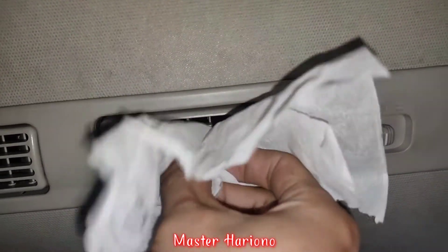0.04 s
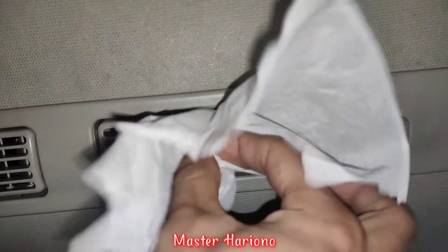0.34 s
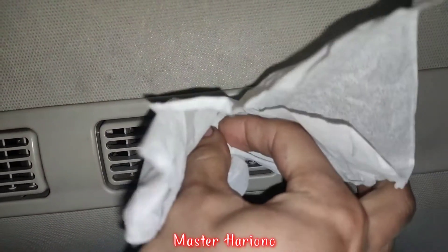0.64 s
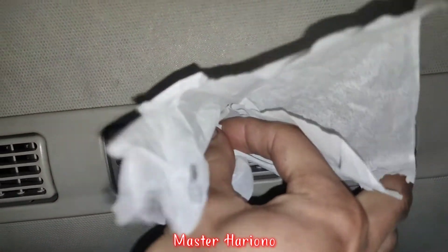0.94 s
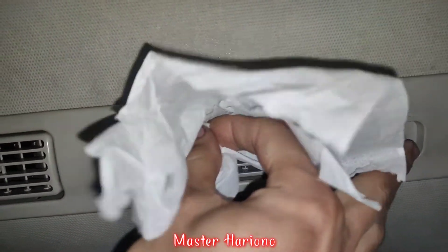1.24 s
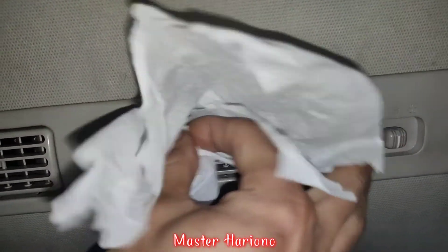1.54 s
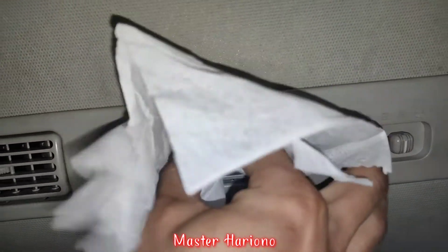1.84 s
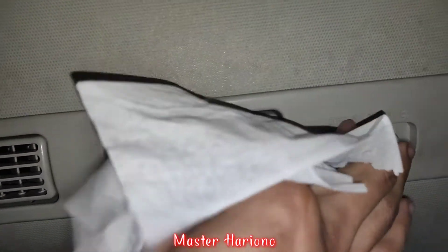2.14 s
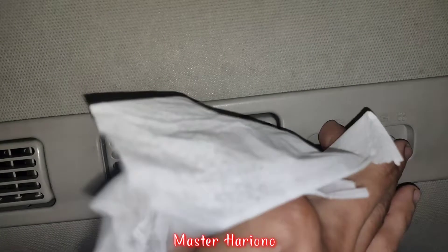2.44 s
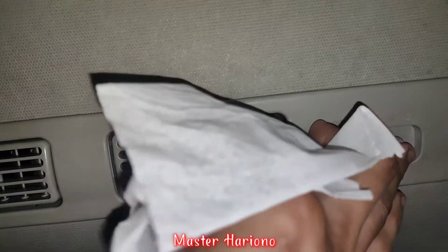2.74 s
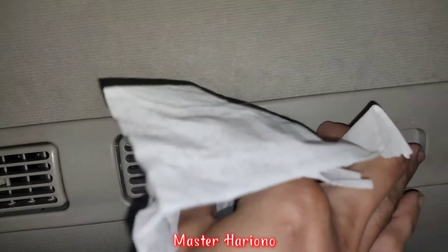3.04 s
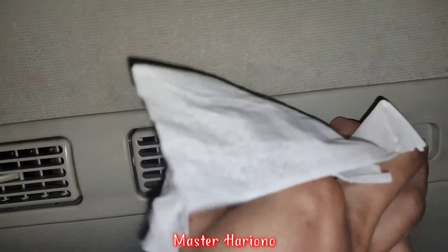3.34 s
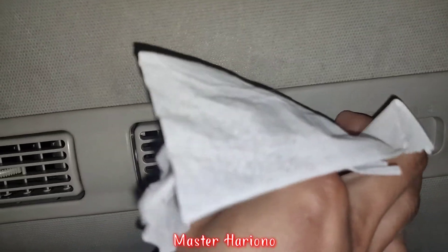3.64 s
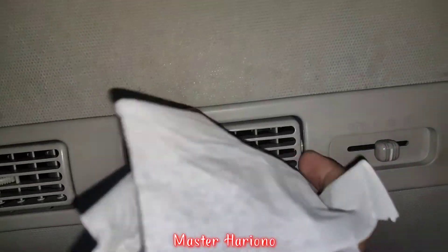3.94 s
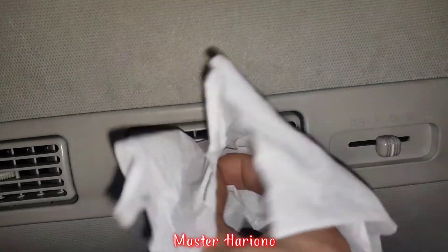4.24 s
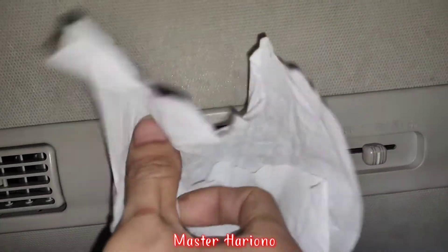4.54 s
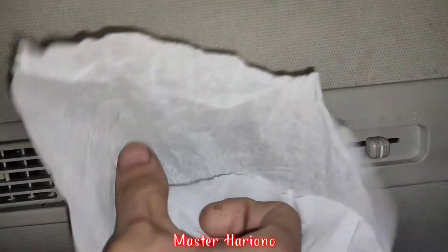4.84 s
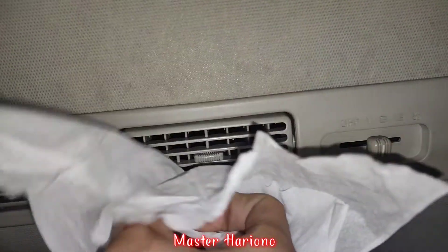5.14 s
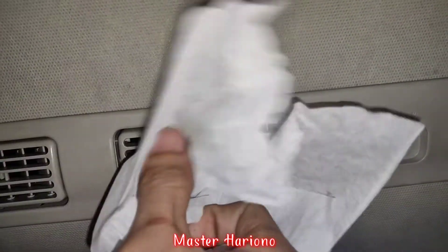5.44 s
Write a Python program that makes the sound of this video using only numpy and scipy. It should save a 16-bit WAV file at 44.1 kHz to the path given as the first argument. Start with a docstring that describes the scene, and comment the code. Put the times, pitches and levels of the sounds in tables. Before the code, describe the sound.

A tissue flaps in gusty air from a car vent; a plastic click, the fan dies down, and the idling car hums on.

```python
"""Inside a car, right at a roof vent, a tissue flaps in the jet of the air conditioning at full speed.
It throws gusts and dry cracks onto the left microphone, over the steady rush of air in the duct.
The switch snaps off and the fan coasts down. The idling car hums on,
a hand bumps the trim and the tissue swishes faintly."""
import sys
import numpy as np
from scipy import signal
from scipy.fft import rfft, irfft, next_fast_len
from scipy.io import wavfile
from scipy.ndimage import map_coordinates

SR = 44100
rng = np.random.default_rng(int(sys.argv[2]) if len(sys.argv) > 2 else 0)


def dump_mix(stems):
    """Bounce the given channels to the path in sys.argv[1] as a 16-bit WAV at rate SR."""
    frames = np.atleast_2d(stems).T  # one column per channel
    limited = np.clip(frames, -1, 1)  # hard clip at full scale
    pcm = np.round(limited * 32767).astype(np.int16)
    wavfile.write(sys.argv[1], SR, pcm)


N = 246334
TIME, FREQ = np.arange(N) / SR, np.geomspace(1, SR / 2, num=4000)
OFF_S, RUNDOWN_S = 3.586, 0.57   # when the motor stops, and how long the air takes to die down
USUAL_JET_DB = -24


# the tissue's big flaps, one gust each: t/s, level/dB, length/s, swirl pitch f/Hz
TISSUE_FLAPS = [(0.004, -13.5, 0.0069, 334), (0.02, -11.5, 0.0061, 301.4), (0.033, -8, 0.0063, 401),
                (0.084, -11, .012, 450.5), (0.102, -15.5, 0.0096, 302), (0.128, -12, 0.0068, 410),
                (0.159, -14, 0.0085, 385), (0.181, -13, 0.012, 430), (0.221, -14, 0.0072, 319),
                (0.316, -12.5, 0.011, 359.1), (.349, -6.5, 0.008, 520), (0.416, -7.5, 0.011, 298),
                (.457, -11.5, 0.0099, 349.6), (0.514, -12, 0.017, 340.6), (0.544, -9, 0.0085, 415.7),
                (0.599, -7, 0.0082, 290.2), (.612, -15, .01, 400), (0.665, -12, 0.017, 377.7),
                (0.716, -12.5, 0.0069, 562), (0.731, -9.5, 0.011, 341.3), (.75, -10, 0.0068, 514.5),
                (.772, -14.5, 0.0082, 430.2), (0.796, -11, 0.0052, 510), (0.816, -7.5, 0.0066, 520.5),
                (.831, -16, .008, 450.2), (0.853, -12, 0.014, 429.5), (0.901, -14, 0.0069, 339),
                (0.938, -10, .013, 363.4), (.957, -13.5, 0.008, 300.3), (1.022, -16.5, .01, 330),
                (1.044, -9.5, 0.007, 260.7), (1.062, -15, 0.0079, 300), (1.08, -13, .01, 380.2),
                (1.113, -12.5, 0.01, 338), (1.154, -10.5, .013, 430.8), (1.173, -16.5, 0.0059, 340),
                (1.232, -8.5, 0.0068, 349.5), (1.28, -11, 0.007, 320.8), (1.326, -10.5, 0.013, 388.7),
                (1.401, -7, 0.0058, 377.7), (1.478, -11.5, 0.009, 339.7), (1.51, -10, 0.0082, 249.4),
                (1.557, -12, .013, 328.8), (1.594, -11, 0.0094, 327.7), (1.641, -10, 0.0066, 481.3),
                (1.679, -11, 0.0081, 349.7), (1.699, -9.5, 0.0076, 310.9), (1.733, -13, .009, 270.6),
                (1.768, -13, 0.0096, 299), (1.796, -9.5, .012, 350.6), (1.87, -11, 0.02, 360),
                (1.906, -15, .012, 329.1), (1.953, -9.5, 0.0084, 290.3), (1.964, -14, 0.018, 140),
                (1.977, -10.5, 0.014, 260), (2.043, -14, .01, 319.8), (2.066, -11.5, 0.022, 339.7),
                (2.117, -10, 0.0062, 329.5), (2.159, -6.5, 0.0072, 371), (2.1945, -8.5, 0.00482, 409.7),
                (2.243, -9.5, 0.0082, 339.7), (2.288, -9.5, 0.0066, 319.1), (2.316, -8, 0.0082, 423.2),
                (2.352, -14, 0.0068, 353), (2.368, -12.5, 0.0078, 400.6), (2.389, -18, 0.0078, 330.6),
                (2.414, -10, 0.0059, 439.3), (2.464, -14, .022, 390.4), (2.493, -17, 0.0069, 360),
                (2.535, -10, .009, 448.5), (2.574, -11, 0.0089, 310), (2.62, -13, 0.0061, 313.5),
                (2.634, -16, .011, 419.3), (2.664, -8.5, 0.0079, 481.2), (2.706, -10.5, .014, 442.3),
                (2.728, -9, 0.0085, 398.7), (2.783, -8.5, 0.0071, 421.4), (2.833, -18, 0.01038, 350.6),
                (2.852, -10, 0.017, 360), (2.911, -12, 0.01, 330.8), (2.9406, -7, 0.0061, 390.4),
                (2.958, -10.5, .008, 270.4), (2.982, -13, 0.0059, 320), (2.997, -13, 0.0089, 409),
                (3.023, -17, 0.0097, 360), (3.053, -12, 0.0055, 439.8), (3.084, -14.5, 0.024, 438.7),
                (3.122, -12, 0.0063, 338.8), (3.152, -12.5, .016, 379.9), (3.175, -12.5, 0.011, 399.5),
                (3.195, -14.5, 0.011, 321.1), (3.212, -17, 0.0081, 349.7), (3.259, -15, .017, 402),
                (3.297, -9, 0.0083, 298.5), (3.335, -12, .016, 411.4), (3.352, -16, 0.0069, 339.7),
                (3.396, -7, 0.0068, 380.2), (3.424, -11, 0.0099, 416), (3.446, -16.5, .012, 430),
                (3.467, -10, 0.0053, 429.5), (3.488, -11, 0.017, 320.3), (3.517, -10.5, 0.0048, 341.3),
                (3.562, -9.5, .013, 408.4), (3.625, -11.5, .016, 370.5), (3.641, -12.5, 0.0051, 380),
                (3.676, -14.5, .01, 349.3), (3.711, -11.5, .011, 310.3), (3.745, -13, 0.0083, 360.2),
                (3.764, -10, .005, 250.7), (3.8, -16.5, .008, 340.2), (3.828, -18, 0.01402, 234.8),
                (3.851, -25.5, .014, 194.9), (3.883, -21.5, 0.013, 200), (3.925, -23, .022, 174.8),
                (3.984, -32, 0.016, 170), (4.018, -34, .015, 170.3)]
# the sound of small swirls of air when their pitch is swirl_hz: f/Hz, level/dB
SWIRL_SPECTRUM = [(20, -27), (50, -9.5), (100, -3), (170, 1.5), (300, -1.5), (480, -3.5), (700, -10.5),
                  (1000, -23.5), (1600, -39), (3000, -62.5), (8000, -75.5)]

def gusts(swirl_hz=363.5, wake_hz=240.05, core_s=0.0062, lead_s=0.002123, skew=0.19):
    """Each gust off the tissue is a spinning core of air in small swirls; faster air sounds higher."""
    rows = np.vstack([TISSUE_FLAPS, trembles()])
    start, level_db, length, hz = rows.T
    # shorter gusts are about half pop, longer ones mostly swirling air; slowing air pops less
    core = air_speed(start) / (1 + (length / core_s) ** 2)
    pops = np.zeros(N)
    for s, db, core_length, pitch in zip(start, level_db, core * length, hz):
        pop, at = vortex(pitch, db), max(int((s - lead_s) * SR), 0)
        pops[at:at + len(pop)] += from_db(db) * np.sqrt(core_length) * pop
    # the wake is the rough air left between gusts
    wake = from_db(USUAL_JET_DB + jet_db(TIME) + rundown_db(TIME) + 2 * drift(59.6)) ** 2
    power = swells(rows, 1 - core) + wake
    mean_hz = (swells(rows, (1 - core) * hz) + wake_hz * rundown_pitch(TIME) * wake) / power
    # reading the noise faster raises its pitch
    swirls = map_coordinates(noise(SWIRL_SPECTRUM), [np.cumsum(mean_hz / swirl_hz)], mode="mirror")
    flow = hold_level(swirls)
    pressure = flow + skew * (flow ** 2 - 1)   # grows with flow squared, which sharpens the peaks
    return pops + np.sqrt(power) * pressure


def trembles(per_s=48, length_s=0.007, jitter_s=0.003):
    """The tissue trembles between flaps, making small gusts: rows as in TISSUE_FLAPS."""
    edges = [0] + [s for s, *_ in TISSUE_FLAPS] + [OFF_S + RUNDOWN_S]
    beats = np.concatenate([np.linspace(a, b, max(round((b - a) * per_s), 1), endpoint=False)[1:]
                            for a, b in zip(edges, edges[1:])])
    late, strong, high = rng.standard_normal((len(beats), 3)).T
    db = -19.5 + 1.02 * jet_db(beats) + rundown_db(beats) + 1.5 * strong
    octaves = 0.035 * jet_db(beats) + 0.1514 * high   # a fuller jet makes faster swirls
    hz = 341.6 * rundown_pitch(beats) * 2 ** octaves
    return np.c_[beats + jitter_s * late, db, np.full(len(beats), length_s), hz]


def vortex(hz, strength_db):
    """A spinning core of air pops on the microphone: a dip, a peak and a short rebound."""
    sharpness = from_db(0.26 * (strength_db + 7)).clip(0.8, 1.8)   # stronger is brighter
    band = signal.butter(3, [0.38 * hz, 1.46 * hz * sharpness], "band", fs=SR, output="sos")
    pop = -signal.sosfilt(band, signal.unit_impulse(SR // 20))
    return pop / np.sqrt(np.sum(pop ** 2) / SR)


# how much of the jet gets past the tissue: t/s, level/dB
JET_STRENGTH = [(0, -18), (.27, -24), (.55, -23), (.8, -19), (1.05, -20.5), (1.2, -31), (1.43, -31),
                (1.6, -24.5), (1.85, -29), (2.3, -28), (2.65, -24), (2.8, -27), (2.92, -20), (3.2, -20),
                (3.37, -26.5), (3.45, -19), (3.68, -19.5), (3.86, -26)]

def jet_db(s):
    """How far the jet at the microphone is above its usual strength."""
    return np.interp(s, *np.transpose(JET_STRENGTH)) - USUAL_JET_DB


def air_speed(s):
    """Share of full air speed: it falls steadily once the motor is off."""
    return np.clip(1 - (s - OFF_S) / RUNDOWN_S, 0.05, 1)


def rundown_db(s):
    """Slower air pushes less hard, so the wind gets quieter."""
    return 20 * np.log10(air_speed(s) ** 1.636)


def rundown_pitch(s):
    """Share of their pitch that the swirls keep as the air slows."""
    return air_speed(s) ** 0.55


# moments when the tissue bellies out: t/s, length/s
TISSUE_LULLS = [(0.062, 0.021), (0.121, 0.01), (0.34, 0.012), (0.439, 0.015), (0.484, .012), (0.52, 0.008),
                (0.634, 0.013), (0.887, 0.0089), (1.001, .012), (1.135, .012), (1.215, 0.014),
                (1.258, 0.019), (1.3, 0.017), (1.364, 0.017), (1.44, 0.028), (1.835, 0.025), (1.933, .02),
                (2.021, 0.017), (2.146, 0.011), (2.219, 0.019), (2.267, 0.015), (2.339, 0.01),
                (2.514, 0.019), (2.654, 0.0073), (2.768, .012), (2.81, .018), (2.875, .012),
                (2.928, 0.0078), (2.971, 0.005), (3.062, 0.0083), (3.242, 0.0099), (3.379, 0.013)]

def lulls(depth_db=-5.5):
    """A gain for the gusts that dips while the tissue blocks the jet."""
    return from_db(depth_db * swells([(s, 0, length) for s, length in TISSUE_LULLS], lean=0))


# the edge of the tissue whips over: t/s, level/dB, f/Hz
EDGE_WHIPS = [(0.0353, -23, 1300), (.0866, -20, 1300), (.155, -22, 1100), (.182, -22.5, 990),
              (0.26, -23, 1400), (0.3476, -18, 1202), (.455, -23, 1149), (0.5403, -32, 1500),
              (0.714, -22, 1348), (.722, -23, 1600), (0.7335, -23, 1200), (.752, -25, 1201),
              (0.7954, -15, 1150), (0.815, -17, 895), (.942, -26, 1149), (1.043, -14.5, 947),
              (1.555, -19, 1505), (1.6968, -20, 1300), (1.7067, -21.5, 1350), (1.862, -24, 1299),
              (2.0499, -22, 1350), (2.0565, -22, 1049), (2.0746, -22, 1498), (2.158, -20.5, 1601),
              (2.1946, -16, 1047), (2.2396, -25, 1097), (2.412, -25, 1001), (2.5356, -21, 1451),
              (2.5754, -23, 1404), (2.703, -23.5, 1303), (2.7272, -24, 1399), (2.849, -24, 1201),
              (2.9012, -23, 1250), (2.9385, -18, 1410), (3.1211, -25.5, 1099), (3.1446, -22.5, 1352),
              (3.157, -24, 1050), (3.1764, -19.5, 1350), (3.256, -25, 999), (3.3353, -23, 1299),
              (3.4215, -23.5, 1300), (3.458, -22, 1154), (3.5158, -25.5, 1149), (3.5618, -20, 1150),
              (3.623, -22.5, 1150)]

def cracks(length_s=0.00067):
    """Each whip of the edge throws a tiny, fast vortex, heard as a dry crack."""
    out = np.zeros(N)
    for s, db, hz in EDGE_WHIPS:
        pop, at = vortex(hz, db), int(s * SR)
        out[at:at + len(pop)] += from_db(db) * np.sqrt(length_s) * pop
    return out


# slow swirls at the edge of the jet: f/Hz, level/dB
SPILL_SPECTRUM = [(20, -7), (60, 0), (110, 22), (180, 2), (350, -18), (1000, -92)]

def spill():
    """When the jet is full, swirls at its edge thump on the sheltered right microphone."""
    db = -40 + 1.67 * jet_db(TIME) + rundown_db(TIME) + 5.5 * drift(9)
    return from_db(db) * hold_level(noise(SPILL_SPECTRUM))


# air rushing in the vent: f/Hz, level/dB per Hz
RUSH_SPECTRUM = [(25, -74), (100, -64), (200, -62.5), (450, -63.5), (900, -69), (1500, -70.5), (2500, -75),
                 (4500, -76), (7300, -77.5), (9000, -83), (11500, -94), (15000, -96.5)]
# pitches at which the duct and grille ring: f/Hz, width/Hz, boost/dB
DUCT_RESONANCES = [(295, 75, 7.5), (684, 110, 2.5), (1077, 170, 5), (1443, 56, 6), (2013, 51, 5),
                   (3800, 120, 1), (5200, 36, 5.5), (5830, 40, 7.5), (6900, 60, 1), (6870, 46, 3.5)]
# how fast the rush dies with the motor off: f/Hz, fade/dB per s
RUSH_FADE = [(100, 1.5), (350, 33.5), (1000, 56), (4000, 91), (12000, 106)]

def blower(flutter_db=0.85):
    """Air rushes through the duct and grille; as the fan coasts, the treble dies first."""
    rush = stereo_noise(RUSH_SPECTRUM, DUCT_RESONANCES)
    coasting_s = np.maximum(TIME - OFF_S, 0)
    centres, out = np.geomspace(150, 10000, num=6), 0
    for hz, share in zip(centres, np.eye(len(centres))):
        band = colour(rush, at_hz(np.c_[centres, share]))
        out = out + band * from_db(flutter_db * drift(24) - at_hz(RUSH_FADE, hz) * coasting_s)
    return out


# the slider scrapes, snaps into its stop and rattles: t/s, level/dB, decay/s
SWITCH_HITS = [(3.5675, -10, 0.03), (3.5701, 3, 0.021), (3.5728, -4.5, 0.036), (3.581, -12, .06),
               (3.594, -19, 0.069)]
# the snap of hard plastic: f/Hz, level/dB per Hz
SNAP_SPECTRUM = [(200, -55), (800, -48), (1500, -50), (2800, -57.5), (4800, -50), (7000, -55), (8400, -48),
                 (10000, -57), (11800, -56.5), (12600, -62), (15000, -64)]
# peaks and dips in the snap: f/Hz, width/Hz, boost/dB
SNAP_RESONANCES = [(3900, 700, -2.5), (6550, 160, 2), (8350, 380, 4), (7360, 120, -6), (9360, 200, -7.5)]
# thin ringing after each hit: f/Hz, level/dB, decay/s
RING_TONES = [(5400, -38, .1), (6640, -29, 0.11), (6959, -35, 0.12), (7860, -34, .08), (7900, -34, 0.085),
              (8342, -14, .04), (8660, -30, .06), (9760, -39, .1), (10820, -43, .1), (13300, -37, .08),
              (14700, -37, .08)]
# the switch is on the right; left microphone compared with right: f/Hz, level/dB
SWITCH_AT_LEFT = [(800, 7.5), (2400, -8.5), (4400, -8.5), (8100, -18), (15000, -19)]

def switch(echo_db=-16, echo_s=0.15):
    """The plastic switch snaps and rings, and the padded cabin gives a short echo."""
    ring = np.zeros(N)
    for s, db, _ in SWITCH_HITS:
        near = slice(*np.searchsorted(TIME, [s, s + 0.5]))
        age = TIME[near] - s
        for hz, tone_db, decay_s in RING_TONES:
            ring[near] += from_db(db + tone_db - 60 * age / decay_s) * np.sin(2 * np.pi * hz * age)
    snap = strikes(SWITCH_HITS)
    echo = strikes([(s, db + echo_db, echo_s) for s, db, _ in SWITCH_HITS])
    left, right = [noise(SNAP_SPECTRUM, SNAP_RESONANCES) * snap + ring + noise(SNAP_SPECTRUM) * echo
                   for side in range(2)]
    return np.array([colour(left, from_db(at_hz(SWITCH_AT_LEFT))), right])


# strokes of the tissue: t/s, level/dB, length/s, extra level of the sizzle/dB
TISSUE_STROKES = [(0.319, 6.5, .24, -2), (3.946, -12, 0.05, -10), (4.026, -9.5, 0.022, -14),
                  (4.111, -12.5, 0.041, -12), (4.329, -13, 0.096, -10), (4.46, -10, .11, -12),
                  (4.509, -7, 0.026, -8), (4.59, -11, .1, -11), (4.72, -14, .14, -11), (4.917, -7, 0.11, 0),
                  (4.969, -4.5, 0.045, 3), (5.085, -13.5, .06, -12), (5.31, -11, 0.077, -12),
                  (5.37, -5, 0.042, -8), (5.5, -13, 0.09, -10), (5.556, -9.5, 0.025, -9)]
# the papery swish and the high sizzle on top: f/Hz, level/dB per Hz
SWISH_SPECTRUM = [(500, -105), (1500, -89.5), (3500, -89), (6500, -86.5), (9000, -90.5), (12000, -101),
                  (15000, -105)]
SIZZLE_SPECTRUM = [(7000, -125), (10500, -104), (12500, -100), (15000, -97)]

def swishes(grain_db=1.5, grain_hz=350, lean=-0.43):
    """The tissue slides in the air and the fingers: grainy swishes that build up and stop short."""
    sizzles = [(s, db + extra_db, length) for s, db, length, extra_db in TISSUE_STROKES]
    swish = stereo_noise(SWISH_SPECTRUM) * np.sqrt(swells(TISSUE_STROKES, lean=lean))
    sizzle = stereo_noise(SIZZLE_SPECTRUM) * np.sqrt(swells(sizzles, lean=lean))
    return (swish + sizzle) * from_db(0.5 + grain_db * drift(grain_hz))


# touches of the hand: t/s, level/dB, decay/s
HAND_BUMPS = [(4.019, -4, 0.093), (4.036, -5, 0.12), (4.053, -7, 0.088)]
# the trim's dull thud: f/Hz, level/dB per Hz
TRIM_SPECTRUM = [(100, -67), (350, -64), (800, -70), (1500, -80), (3000, -86.5), (8000, -100),
                 (15000, -104)]
# pitches at which the trim rings: f/Hz, width/Hz, boost/dB
TRIM_RESONANCES = [(303.4, 29, 21), (427, 31, 5), (951, 150, 3), (1950, 520, 4)]

def trim_bump():
    """A hand softly bumps the trim and slides off."""
    return stereo_noise(TRIM_SPECTRUM, TRIM_RESONANCES) * strikes(HAND_BUMPS)


# rumble of the idling car: f/Hz, level/dB per Hz
RUMBLE_SPECTRUM = [(20, -72), (60, -78.5), (110, -72), (200, -73.5), (280, -79.5), (480, -81.5),
                   (560, -86.5), (900, -90.5), (1600, -97.5), (3500, -102.5), (6500, -104.8),
                   (11500, -111.5), (15500, -106)]
# pitches at which the cabin booms: f/Hz, width/Hz, boost/dB
CABIN_RESONANCES = [(224.5, 10.6, 11), (310, 10.6, 5), (493, 22, 4.8)]
# how alike the rumble is on both sides: f/Hz, likeness from 0 to 1
RUMBLE_LIKENESS = [(60, 0.82), (290, 0.99), (640, 0.24), (1400, 0), (15000, 0.31)]
# tones of the hum at its usual pitch: f/Hz, level/dB
HUM_TONES = [(23.5, -64), (117.9, -61), (212, -54.5), (228, -61.5), (423.6, -52), (838, -71)]
# the strongest tone sags briefly, and the others move with it: t/s, f/Hz
HUM_GLIDE = [(4.0, 430), (4.136, 423.7), (4.586, 425.8), (4.704, 418.5), (4.926, 420.6), (5.01, 413),
             (5.328, 422.1), (5.586, 420.3)]

def idling_car(usual_hz=423.6, waver=0.00302, throb_db=0.8, fade_db_per_s=1.1):
    """The idling car rumbles and hums unsteadily; the hum eases once the blower is off."""
    alike = np.clip(at_hz(RUMBLE_LIKENESS), 0, 1)
    right, unrelated = [noise(RUMBLE_SPECTRUM, CABIN_RESONANCES) for side in range(2)]
    left = colour(right, alike) + colour(unrelated, np.sqrt(1 - alike ** 2))
    speed = np.interp(TIME, *np.transpose(HUM_GLIDE)) / usual_hz + waver * drift(4.54)
    phase = 2 * np.pi * np.cumsum(speed) / SR
    fade_db = fade_db_per_s * np.maximum(TIME - OFF_S, 0)
    hum = sum(np.sqrt(2) * from_db(db - fade_db - throb_db * drift(7.4)) * np.sin(hz * phase)
              for hz, db in HUM_TONES)
    return np.array([left_microphone(left + hum), right + hum])


# left microphone compared with right: f/Hz, level/dB
LEFT_RESPONSE = [(100, -7), (400, -9), (1000, -5), (2400, -4.5), (3500, -2), (6000, -2), (7200, -10.5),
                 (8000, -7.5), (8700, -16.5), (10000, -3.5), (13000, -5.5), (15500, -8)]

def left_microphone(x):
    """The left microphone hears the cabin more quietly, with a different tone."""
    return colour(x, from_db(at_hz(LEFT_RESPONSE)))


def stereo_noise(spectrum, resonances=()):
    """Noise arriving from all around, as the two microphones hear it."""
    return np.array([left_microphone(noise(spectrum, resonances)), noise(spectrum, resonances)])


def noise(spectrum, resonances=()):
    """Noise with the given spectrum, boosted at its resonances."""
    boost_db = sum(db / (1 + (2 * (FREQ - hz) / width) ** 2) for hz, width, db in resonances)
    return colour(rng.standard_normal(N) * np.sqrt(SR / 2), from_db(at_hz(spectrum) + boost_db))


def drift(rate_hz):
    """A smooth random wander, about 1 in size."""
    slow = colour(rng.standard_normal(N), np.exp(-(FREQ / rate_hz) ** 2))
    return slow / slow.std()


def swells(rows, weights=1, lean=0.248):
    """Total power of bell-shaped swells; a positive lean makes them rise faster than they fall."""
    out = np.zeros(N)
    for weight, (s, db, length, *_) in zip(weights * np.ones(len(rows)), rows):
        near = slice(*np.searchsorted(TIME, [s - 3 * length, s + 3 * length]))
        age = (TIME[near] - s) / length
        bell = np.exp2(-(2 * age / (1 + lean * np.sign(age))) ** 2)
        out[near] += weight * from_db(db) ** 2 * bell
    return out


def strikes(rows):
    """Loudness of sudden hits, each falling 60 dB in its decay time."""
    return np.sqrt(sum((TIME >= s) * from_db(db - 60 * np.clip((TIME - s) / decay_s, 0, 2)) ** 2
                       for s, db, decay_s in rows))


def hold_level(x, span_s=0.032):
    """Even out a noise so its strength stays near 1."""
    window = np.hanning(int(span_s * SR))
    power = signal.fftconvolve(x * x, window / window.sum(), "same")
    return x / np.sqrt(power.clip(1e-20))


def colour(x, gain):
    """Turn each frequency of a sound up or down."""
    size = next_fast_len(N, True)
    hz = np.arange(size // 2 + 1) * SR / size
    return irfft(rfft(x, size) * np.interp(hz, FREQ, gain), size)[..., :N]


def at_hz(points, hz=FREQ):
    """Read between a table's rows, with octaves evenly spaced."""
    known_hz, values = np.transpose(points)
    return np.interp(np.log(hz), np.log(known_hz), values)


def from_db(db):
    """Decibels to gain."""
    return 10 ** (np.asarray(db) / 20)


def scene(gust_db=0.83, crack_db=1.5):
    """Wind hits each microphone separately; all other sounds reach both."""
    left_wind = from_db(gust_db) * gusts() * lulls() + from_db(crack_db) * cracks()
    wind = np.array([left_wind, spill()])
    return wind + blower() + switch() + idling_car() + swishes() + trim_bump()


def record(dry, cutoff_hz=15600):
    """Round off the tallest peaks and cut the highest treble."""
    rounded = dry / (1 + dry ** 8) ** (1 / 8)
    return signal.sosfilt(signal.ellip(10, 0.1, 80, cutoff_hz, fs=SR, output="sos"), rounded)


dry = scene()
out = record(dry)
dump_mix(out)
```